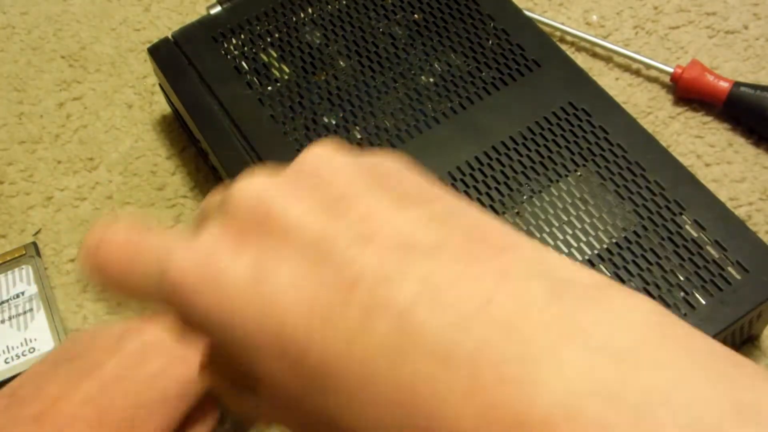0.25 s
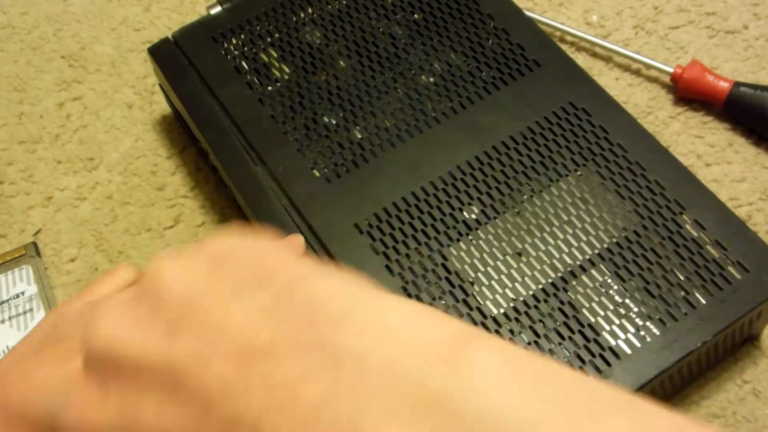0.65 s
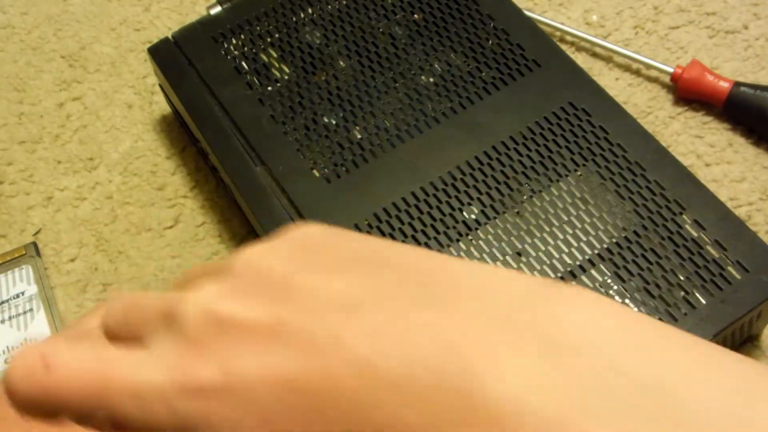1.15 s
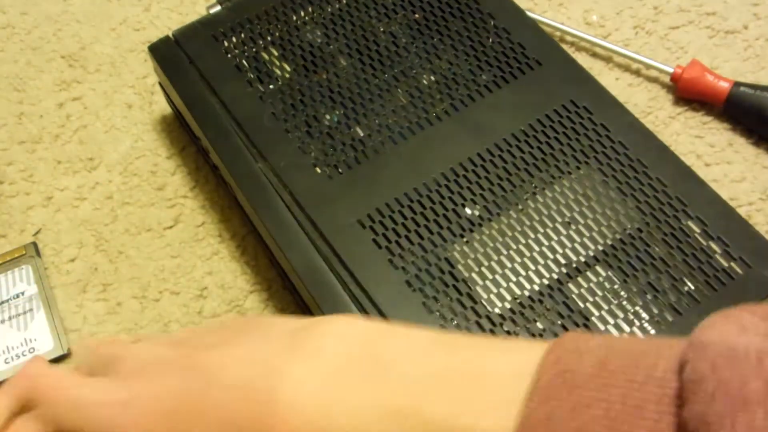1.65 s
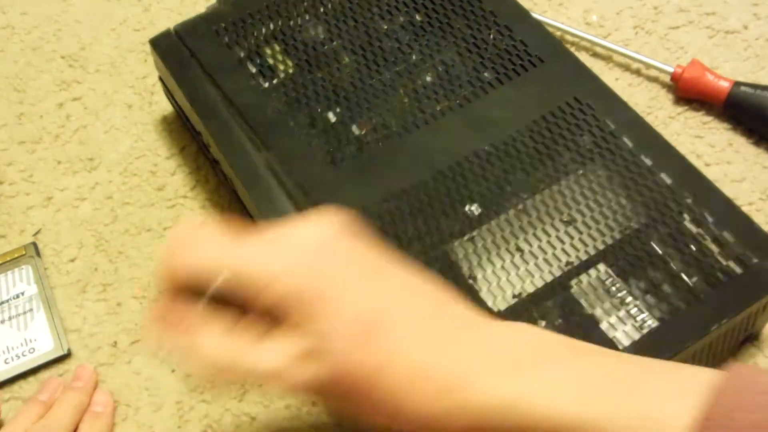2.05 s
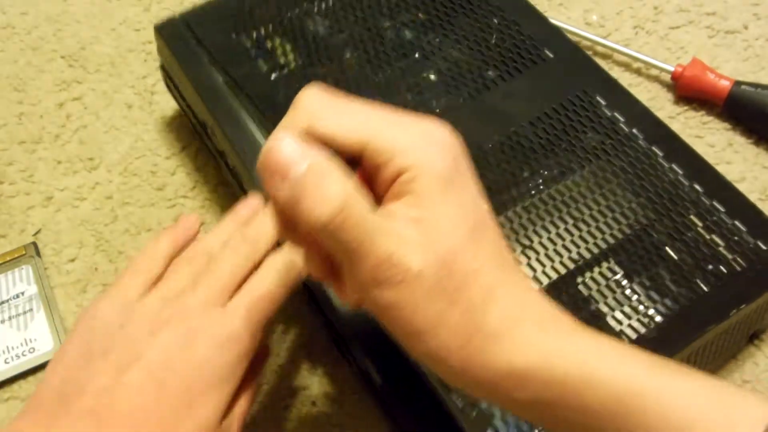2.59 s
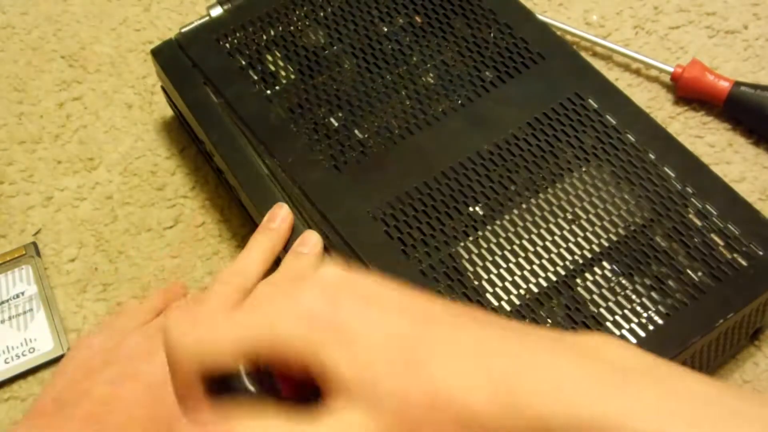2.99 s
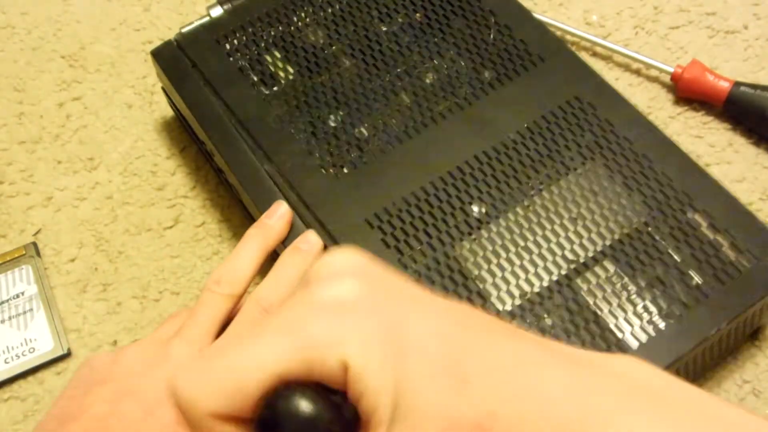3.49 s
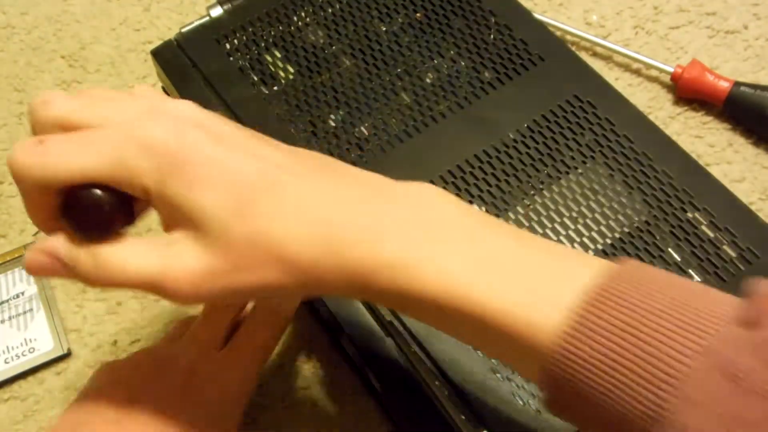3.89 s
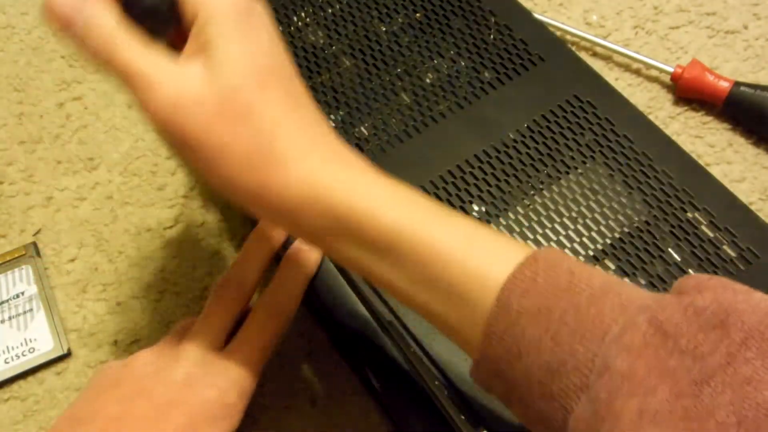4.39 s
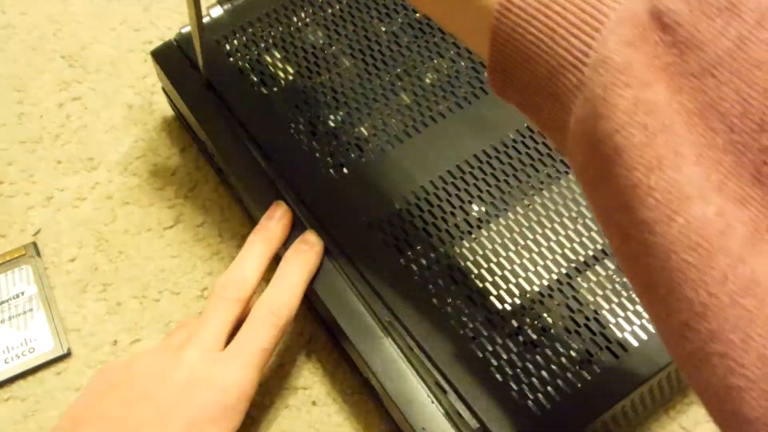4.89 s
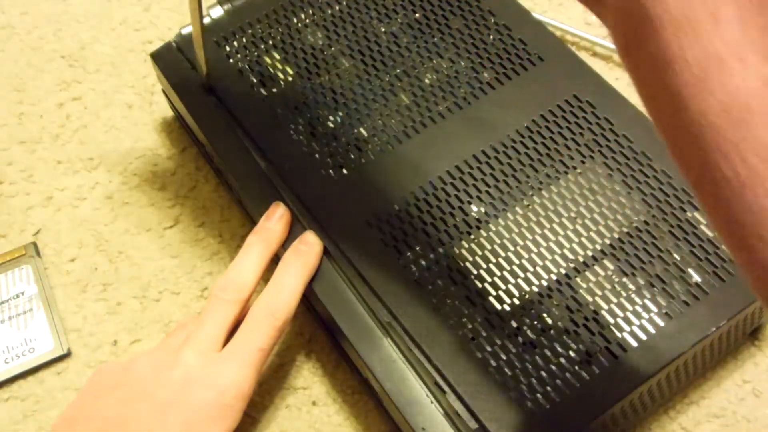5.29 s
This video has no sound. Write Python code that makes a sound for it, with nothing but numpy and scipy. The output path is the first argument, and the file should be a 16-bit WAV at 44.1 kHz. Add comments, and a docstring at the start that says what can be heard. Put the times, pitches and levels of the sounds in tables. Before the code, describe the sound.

A screwdriver pries at the thin steel cover of an electronic box, heard close in a small furnished room. Faint dull taps open, with a firm metallic knock at 0.5 seconds. From about 1.5 to 1.8 seconds comes a loud cluster of sharp snaps and a grinding scrape, followed by lighter clicks around 2 seconds. Small ticks lead to a knock at 2.7. From 2.9 to 3.6 the cover's edge grinds over the casing in short, catching strokes, with a sharp, bright one at 3.5. Another knock lands at 4 seconds. Light taps and ticks follow from 4.5, building to the loudest, slightly distorted snap at 5.5 as the cover jumps a catch. Every contact rings the same thin panel briefly. Soft finger rubs, low room rumble and hiss lie faintly underneath.

```python
"""Light, dull taps on sheet steel, then sharp snaps and grinding: a screwdriver pries at the cover
of an electronic box lying on carpet. The blade taps and slips in the seam; the cover's edge grinds
over the casing in stick-slip strokes and snaps past its catches, loudest at the end.
Every contact rings the same thin panel, and a small furnished room answers briefly.
Underneath: soft finger rubs, room rumble and hiss."""
import sys
import numpy as np
from scipy import signal
from scipy.fft import rfft, irfft
from scipy.io import wavfile

SR = 44100
rng = np.random.default_rng(int(sys.argv[2]) if len(sys.argv) > 2 else 0)


def materialize(psi):
    """Save the field psi as 16-bit PCM at rate SR to the path in sys.argv[1].

    A 1-D psi becomes a single channel; in a 2-D psi each row is a channel.
    """
    bounded = np.clip(np.atleast_2d(psi).T, -1, 1)
    quanta = np.round(bounded * 32767).astype(np.int16)
    wavfile.write(sys.argv[1], SR, quanta)


N = 244358

# room rumble and hiss: (frequency [Hz], relative density [dB])
FLOOR_SPECTRUM = [(20, -2), (40, -6.5), (65, -3.5), (110, -13.5), (300, -19), (600, -25), (1200, -28),
                  (2000, -33), (3500, -37.5), (14400, -42)]
# their stereo width: (frequency [Hz], side re mid [dB])
FLOOR_SIDE = [(60, -10), (180, -3.5), (540, -4.5), (1640, -2), (4920, 2), (14800, -2)]
# room decay: (frequency [Hz], T60 [s])
ROOM_DECAY = [(150, 0.17), (500, .32), (1400, 0.28), (4000, 0.25), (9000, 0.22), (14000, 0.26)]
# decay of the panel's crowded short modes: (frequency [Hz], T60 [s])
PANEL_DECAY = [(150, 0.14), (1000, 0.08), (4000, 0.095), (14000, 0.12)]
# long tones of the steel cover: (frequency [Hz], level [dB], T60 [s])
COVER_MODES = [(357.7, -26.5, 0.29), (396, -24, 0.36), (683, -21, 0.14), (1004, -19, 0.12),
               (1105, -30.5, 0.48), (1820, -28.5, 0.6), (2230, -29, 0.46), (2690, -25.5, 0.44),
               (3155, -28.5, 0.82), (3570, -24, 0.3), (3780, -26, 0.4), (4050, -25.5, 0.34),
               (4160, -22, 0.3), (4284, -25, 0.44), (4520, -26, 0.22), (4870, -31, 0.35), (5178, -31, 0.31),
               (5840, -20, 0.13), (5920, -20.5, 0.24), (6600, -18.5, .26), (6645, -21.5, .18),
               (7020, -21, 0.12), (8130, -29.5, 0.16)]
# casing resonances and dips: (frequency [Hz], width [Hz], gain [dB])
CASING_BANDS = [(173, 52, 9), (253, 87, -5), (716, 56, -2.5), (357, 11, 7.5), (451, 62, 5), (657, 30, 5.5),
                (1019, 19, 4.5), (1155, 160, 4.5), (1740, 240, 3), (4500, 400, 0), (5850, 600, -1),
                (6640, 110, 0)]
# stereo width of the box: (frequency [Hz], side re mid [dB])
BOX_SIDE = [(130, -5), (400, -24), (1100, -23.5), (2000, -17), (4000, -10), (8000, -5.5), (13000, -2.5)]
# sliding strokes; heave is extra thump from shoving the hollow casing:
# (time [s], time to stall [s], force [dB], hardness [0-1], heave [dB], spot resonance [Hz])
EDGE_STROKES = [(0, 0.0096, -44, 0.19, -3, 800), (.155, 0.041, -57.5, 0.34, -0.5, 800),
                (0.655, 0.028, -45.5, 0.25, 1, 1800), (1.45, 0.022, -27, 0.35, -5, 540),
                (1.624, 0.12, -16.5, 0.56, -17, 1320), (2.034, 0.02, -36, 0.21, -1.5, 176),
                (2.13, 0.91, -61, 0.47, 3, 1040), (2.877, .03, -41, 0.4, 2.5, 700),
                (2.909, 0.054, -33, 0.37, -1.5, 700), (3.001, 0.032, -35.5, 0.16, 1, 434.4),
                (3.042, 0.031, -33.5, 0.15, 2.5, 656), (3.177, 0.052, -22.5, 0.34, -7, 600),
                (3.252, .014, -25, 0.47, -7.5, 1131), (3.336, .012, -25, 0.31, 2.5, 540),
                (3.35, .028, -21.5, 0.16, -5, 365), (3.468, 0.024, -33.5, 0.2, 11, 190),
                (3.484, 0.017, -4, 0.66, -9, 5790), (3.535, 0.01, -16, 0.58, -9, 1030),
                (4.067, 0.053, -49, 0.08, -3, 1103), (4.34, 0.031, -59, .3, 0, 1034),
                (5.17, 0.011, -43.5, 0.23, 8.5, 1100)]
# taps and snaps; ring is low where the blade damps the panel:
# (time [s], force [dB], hardness [0-1], ring [dB], spot resonance [Hz])
IMPACTS = [(.072, -23, 0.062, -2.5, 706), (.244, -20, 0.08, -2.5, 1300), (.518, -4.5, 0.17, 4, 161),
           (.526, -2, 0.64, 4.5, 1220), (.666, -24.5, 0.55, 11, 4220), (.707, -25.5, 0.23, 8, 1780),
           (.943, -24.5, 0, 1, 1065), (.961, -23, 0.087, -7, 1080), (1.469, 2.5, 0.47, 3, 1990),
           (1.629, 1.5, 0.74, 9, 2780), (1.733, 4, 0.97, 8, 2650), (1.759, 1.5, 0.4, 6, 1650),
           (1.779, 2.5, 0.93, 5.5, 1700), (1.973, -14, 0.52, 6, 1685), (2.0296, -14.5, 1, -16, 4400),
           (2.089, -10, 0.65, -3, 990), (2.113, -26, .9, 2, 1000), (2.31, -25, 0.22, 4.5, 990),
           (2.332, -25, 0.89, -1, 1050), (2.478, -20.5, 0.39, -3, 1050), (2.578, -24.5, 0.58, 4, 1100),
           (2.667, -26.5, 0.83, 0.5, 1050), (2.703, -5, 0.29, -3.5, 662), (2.7058, 1.5, 0.12, -4, 1810),
           (3.992, 3.5, 0.51, 2, 168), (4.557, -25.5, 0.38, 3.5, 1010), (4.635, -33.5, 0.16, 4.5, 403),
           (4.728, -29, 0.6, 2.5, 1795), (4.7405, -19.5, 0.16, 6.5, 1798), (5.16, -20.5, 0.3, -2, 1000),
           (5.178, -19, .5, 6.5, 1100), (5.391, -22.5, 0.68, 2.5, 6000), (5.412, -12.5, 0.93, 7, 5670),
           (5.4796, -14, 1, 4, 4960), (5.508, -3, 1, 0, 3300), (5.5137, 20.5, 0.77, 1, 3210),
           (5.518, 17.5, 0.3, -4, 1810)]

COLOUR_HZ = (280, 1100, 4200, 11000)  # thump, clank, 0 dB reference, fizz
DULL_DB, SHARP_DB = (4, 12.84, -19), (-14, -16.5, 3.5)  # thump, clank, fizz at hardness 0 and 1
IR_SAMPLES = 2 ** 15
GRID_HZ = np.fft.rfftfreq(IR_SAMPLES, 1 / SR)
AGE_S = np.arange(IR_SAMPLES) / SR


def amp(db):
    """Decibels to gain."""
    return 10 ** (np.asarray(db) / 20)


def curve(points, hz):
    """Table interpolated on a log-frequency axis."""
    knots_hz, values = np.transpose(points)
    return np.interp(np.log(hz + 1), np.log(knots_hz + 1), values)


def unit(x):
    """Each channel scaled to energy one."""
    return x / np.sqrt(np.sum(x ** 2, axis=-1, keepdims=True) + 1e-20)


def add(mix, start_s, sound):
    """Mixes in a two-channel sound."""
    part = mix[:, round(start_s * SR):][:, :sound.shape[1]]
    part += sound[:, :part.shape[1]]


def resonance(hz, width_hz):
    """Resonance curve of height one."""
    return 1 / (1 + (2 * (GRID_HZ - hz) / width_hz) ** 2)


def equalise(x, gain_db):
    """Minimum-phase filter; gain given on GRID_HZ."""
    cepstrum = irfft(np.maximum(gain_db, -100) * np.log(10) / 20)
    cepstrum[1:IR_SAMPLES // 2] *= 2
    cepstrum[IR_SAMPLES // 2 + 1:] = 0
    impulse = irfft(np.exp(rfft(cepstrum)))[:IR_SAMPLES // 8]
    return signal.fftconvolve(x, impulse)[:len(x)]


def noise_floor(level_db=-57):
    """Low room rumble under even hiss; mid and side."""
    hz = np.fft.rfftfreq(N, 1 / SR)
    mid, side = rfft(rng.standard_normal((2, N))) * amp(curve(FLOOR_SPECTRUM, hz))
    pair = irfft(np.array([mid, side * amp(curve(FLOOR_SIDE, hz))]), N)
    return amp(level_db) * pair / pair[0].std()


def diffuse_decay(t60_table):
    """Crowded modes as noise, each band dying at its own rate."""
    hz, t, bands = signal.stft(rng.standard_normal((2, IR_SAMPLES)), SR, nperseg=128)
    fade = amp(-60 * t / curve(t60_table, hz)[:, None])
    return unit(signal.istft(bands * fade, SR)[1][:, :IR_SAMPLES])


def cover_tones(split_hz=7, spread_db=0.4):
    """The bent cover splits each mode into a beating pair; each spot weights the modes differently."""
    hz, level_db, t60_s = np.transpose(COVER_MODES)
    size = (2, len(hz))
    pairs_hz = hz + split_hz * rng.standard_normal(size)
    cycles = pairs_hz[..., None] * AGE_S + rng.random(size)[..., None]
    beating = np.sin(2 * np.pi * cycles.astype(np.float32)).sum(0)
    tones = unit(beating * amp(-60 * AGE_S / t60_s[:, None]))
    weights = rng.choice([-1, 1], size) * amp(level_db - spread_db * rng.standard_normal(size))
    return weights @ tones


def spot_response(ring_db, tones_db, crack_db=-5, panel_db=-3, modes_db=-2, room_db=-6):
    """Impulse response of one spot: a crack, then short panel modes, long tones and the room."""
    crack_rise_s, crack_decay_s, room_rise_s = 0.0012, 0.0021, 0.0034
    envelope = np.exp(-AGE_S / crack_decay_s) * (1 - np.exp(-AGE_S / crack_rise_s))
    crack = unit(rng.standard_normal((2, IR_SAMPLES)) * envelope)
    tones = amp(modes_db + tones_db) * cover_tones()
    room = amp(room_db) * unit(diffuse_decay(ROOM_DECAY) * (1 - np.exp(-AGE_S / room_rise_s)))
    panel = amp(panel_db) * diffuse_decay(PANEL_DECAY)
    return amp(crack_db) * crack + amp(ring_db) * (panel + tones + room)


def radiate(force, thump_db, clank_db, fizz_db, spot_hz, ring_db=0, tones_db=0, spot_db=6.5, spot_q=6):
    """Contact force to mid and side sound, coloured by contact, casing and spot."""
    shelf_db, low_cut_hz = -2, 140
    colour_db = curve(list(zip(COLOUR_HZ, (thump_db, clank_db, 0, fizz_db))), GRID_HZ)
    colour_db += sum(db * resonance(hz, width_hz) for hz, width_hz, db in CASING_BANDS)
    colour_db += shelf_db * resonance(0, width_hz=18000)
    colour_db += spot_db * resonance(spot_hz, spot_hz / spot_q)
    colour_db -= 10 * np.log10(1 + (low_cut_hz / (GRID_HZ + 1)) ** 6)  # a small box radiates little bass
    mid, side = spot_response(ring_db, tones_db)
    pair = np.array([equalise(mid, colour_db), equalise(side, colour_db + curve(BOX_SIDE, GRID_HZ))])
    return signal.fftconvolve(pair, force[None], axes=1)


def contact_colour(force_db, hardness):
    """Thump, clank and fizz in dB: hard contacts are bright, soft ones dull."""
    thump_db, clank_db, fizz_db = np.add(DULL_DB, hardness * np.subtract(SHARP_DB, DULL_DB))
    thump_db -= 0.17 * force_db  # a light contact lasts longer
    fizz_db -= 0.12 * force_db  # a heavy one flattens the edge
    return thump_db, clank_db, fizz_db


def finger_rubs(force_db=-70, spread_db=4, shifts_per_s=22):
    """Soft rubs swell and fade as fingers shift on the cover."""
    grips = np.clip(rng.standard_normal(N), -2, 2)
    pressure = np.interp(np.arange(N) * shifts_per_s / SR, np.arange(N), grips)
    force = rng.standard_normal(N) * amp(force_db + spread_db * pressure)
    rubs = radiate(force, thump_db=11, clank_db=9, fizz_db=-4, spot_hz=1200, ring_db=1, tones_db=-8.5)
    return rubs[:, :N]


def stick_slip(samples, slips_per_s=330, jitter=0.3, spread_db=3, grit_db=-7):
    """Friction force of mean power one: a quick, uneven train of slips over fine grit."""
    gaps, sizes, grit = rng.standard_normal((samples, 3)).T
    waits = np.exp(jitter * gaps) * SR / slips_per_s
    onsets = (np.cumsum(waits) - waits[0] * rng.random()).astype(int)
    inside = onsets < samples
    train = np.bincount(onsets[inside], amp(spread_db * sizes[inside]), samples)
    return np.sqrt(samples) * unit(unit(train) + amp(grit_db) * unit(grit))


def edge_scrapes(bite_s=0.01, stall_s=0.04, ends_db=-16, points=3):
    """The edge bites, grinds at full force, then stalls; each bearing point slips on its own."""
    out = np.zeros((2, N))
    for start_s, length_s, force_db, hardness, heave_db, spot_hz in EDGE_STROKES:
        t = np.arange(0, length_s + stall_s, 1 / SR)
        biting = np.maximum(1 - t / bite_s, 0)
        stalling = np.maximum(t - length_s, 0) / stall_s
        push = amp(force_db + ends_db * (biting + stalling))
        thump_db, clank_db, fizz_db = contact_colour(force_db, hardness)
        for _ in range(points):
            force = push * stick_slip(2 * SR)[:len(t)] / np.sqrt(points)
            # the pressed edge damps the long tones
            grind = radiate(force, thump_db + heave_db, clank_db, fizz_db, spot_hz,
                            tones_db=-2.5, spot_q=7)
            add(out, start_s, grind)
    return out


def taps_and_snaps(gain_db=1):
    """The blade knocks on the steel and catches snap free, one impulse each."""
    out = np.zeros((2, N))
    for start_s, force_db, hardness, ring_db, spot_hz in IMPACTS:
        blow = amp([force_db + gain_db])
        colour_db = contact_colour(force_db, hardness)
        tones_db = -6.5 + 0.97 * ring_db  # the freer the panel, the more its long tones sing
        add(out, start_s, radiate(blow, *colour_db, spot_hz, ring_db, tones_db, spot_db=8))
    return out


def scene(tilt_db=0.25):
    """All sources, mid and side to left and right, leaning slightly right."""
    mid, side = taps_and_snaps() + edge_scrapes() + finger_rubs() + noise_floor()
    return np.array([mid + side, mid - side]) * amp([[-tilt_db], [tilt_db]])


def record(dry):
    """The hardest snaps overload and clip; a low-pass follows."""
    cutoff_hz = 14250
    lowpass = signal.firwin(511, cutoff_hz, window=("kaiser", 8), fs=SR)
    return signal.oaconvolve(np.clip(dry, -1, 1), lowpass[None], "same", axes=1)


dry = scene()
out = record(dry)
materialize(out)
```